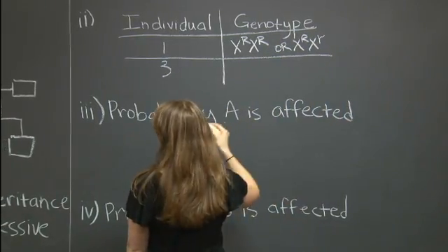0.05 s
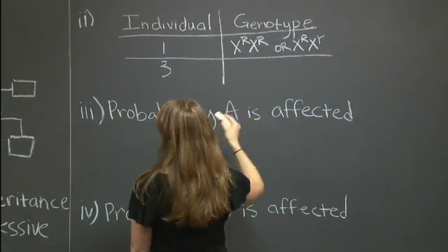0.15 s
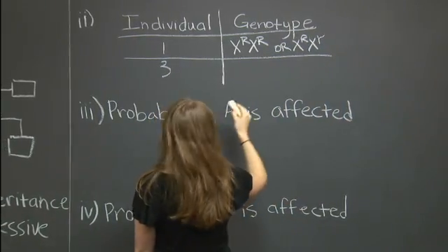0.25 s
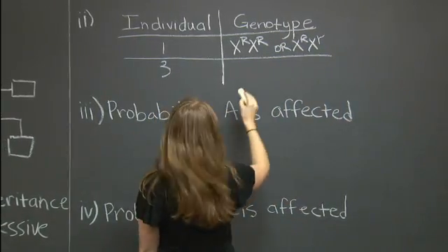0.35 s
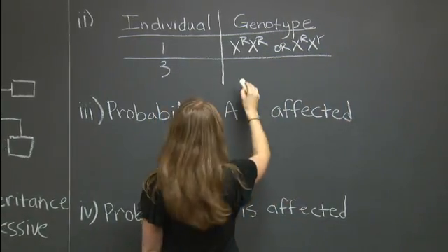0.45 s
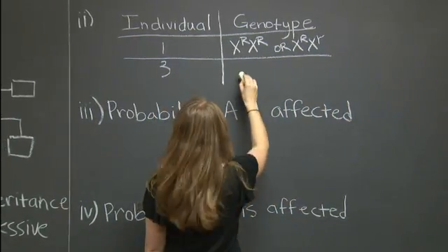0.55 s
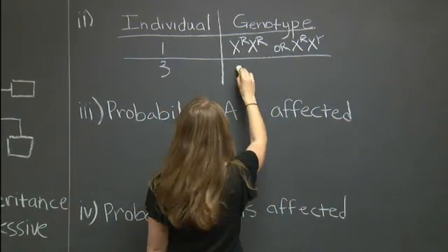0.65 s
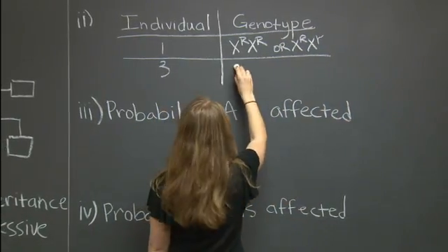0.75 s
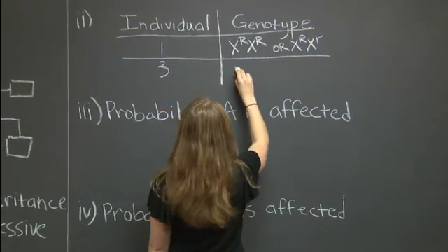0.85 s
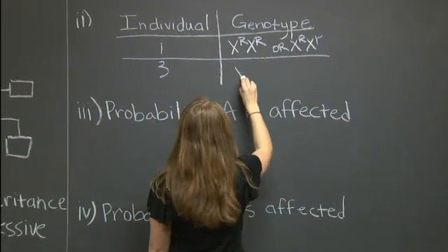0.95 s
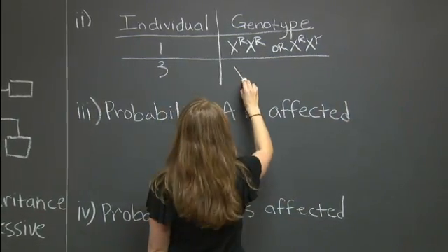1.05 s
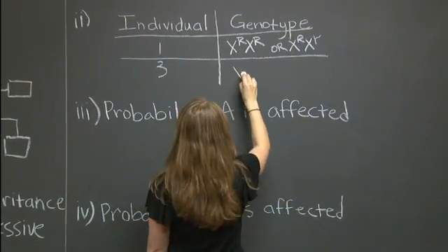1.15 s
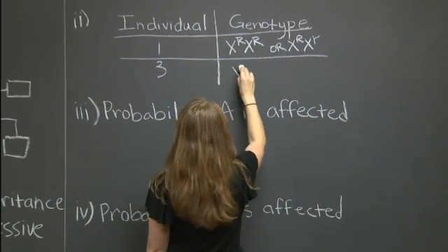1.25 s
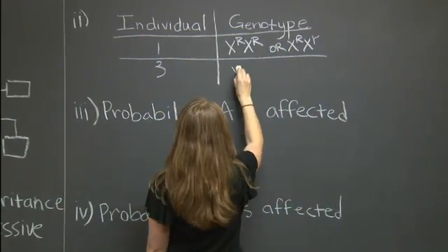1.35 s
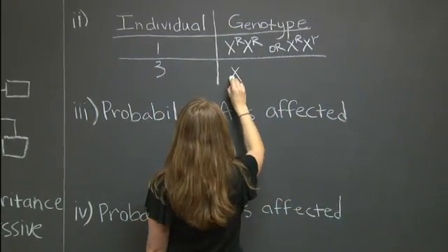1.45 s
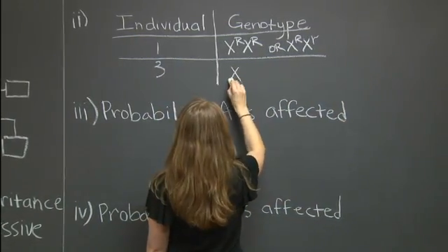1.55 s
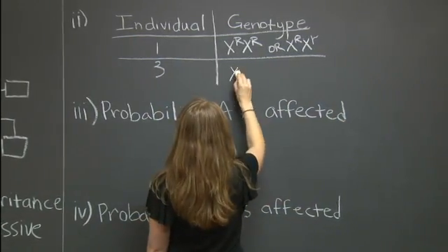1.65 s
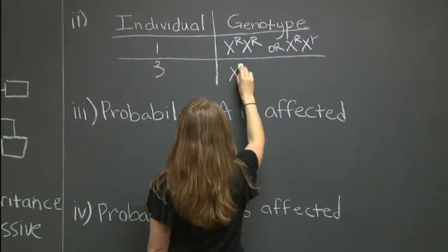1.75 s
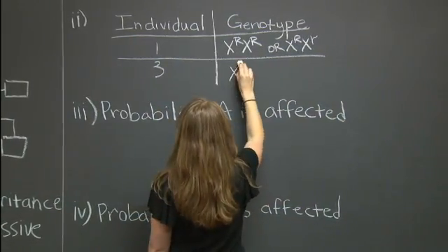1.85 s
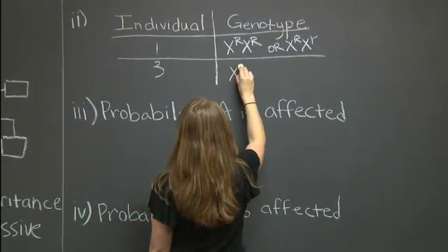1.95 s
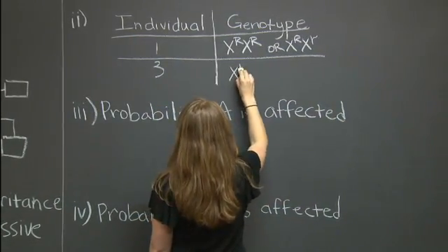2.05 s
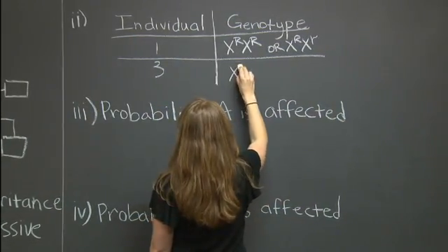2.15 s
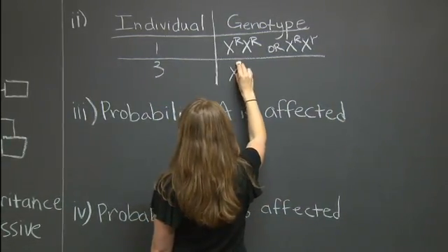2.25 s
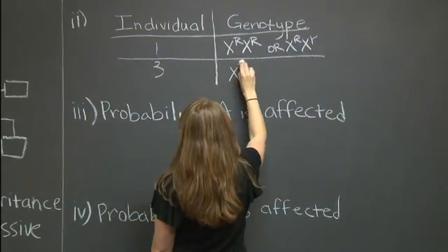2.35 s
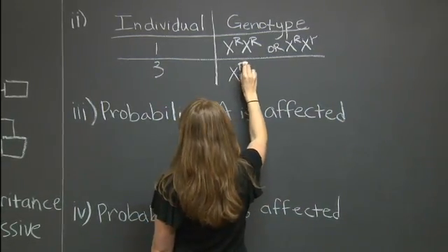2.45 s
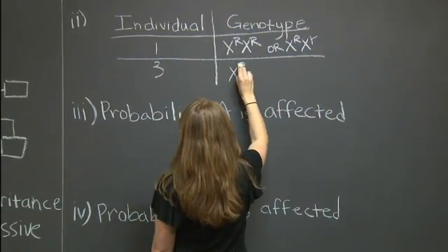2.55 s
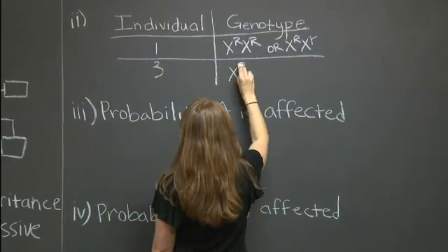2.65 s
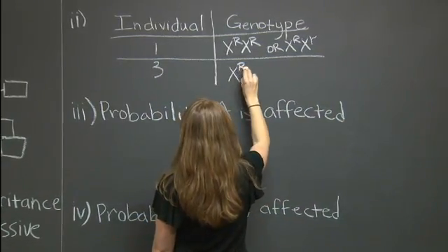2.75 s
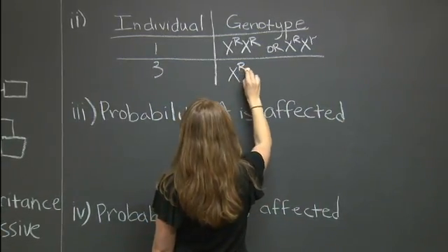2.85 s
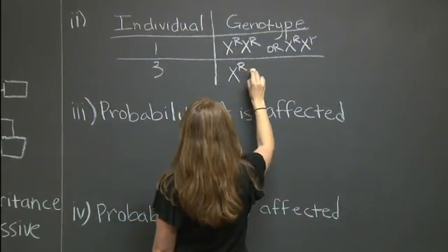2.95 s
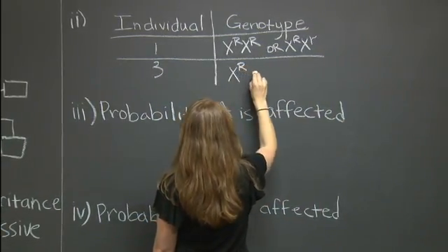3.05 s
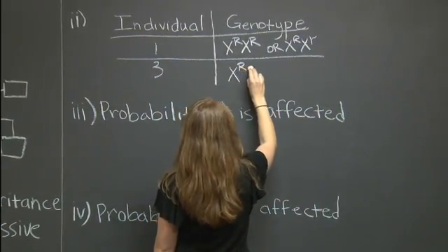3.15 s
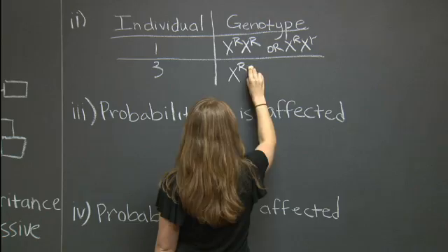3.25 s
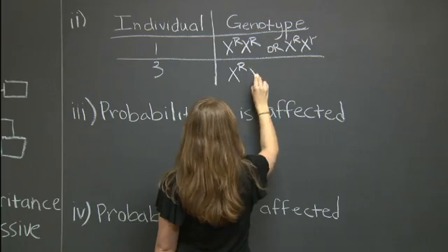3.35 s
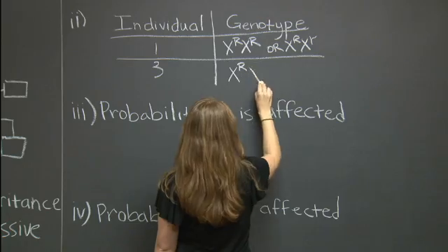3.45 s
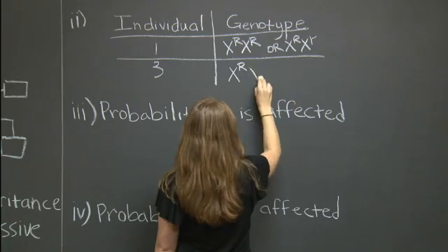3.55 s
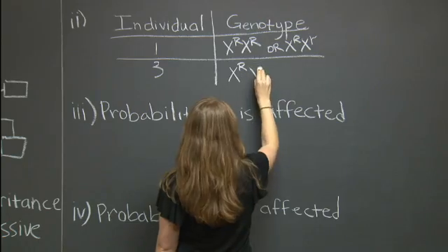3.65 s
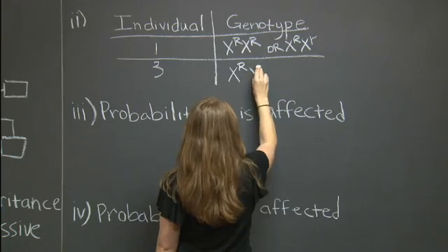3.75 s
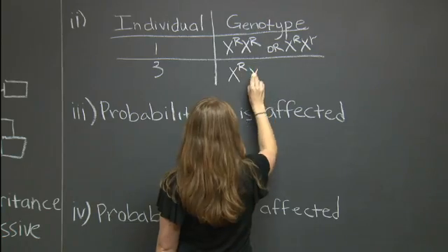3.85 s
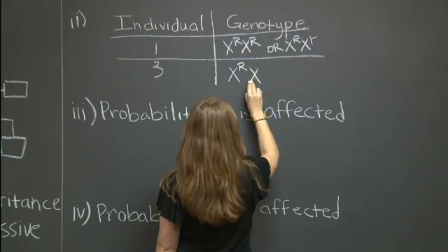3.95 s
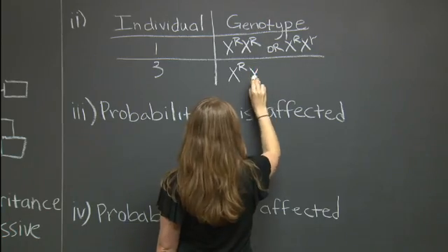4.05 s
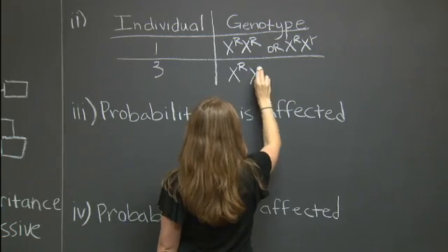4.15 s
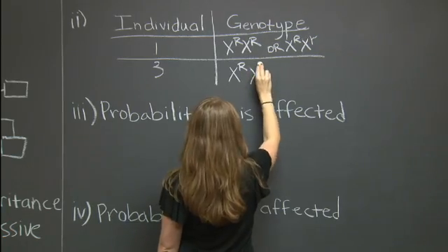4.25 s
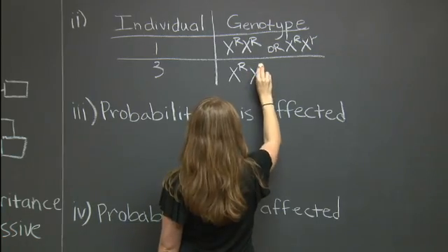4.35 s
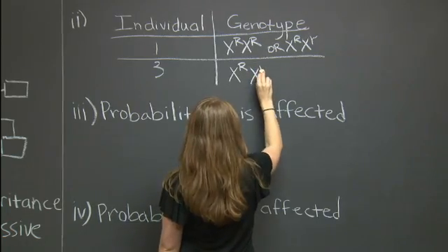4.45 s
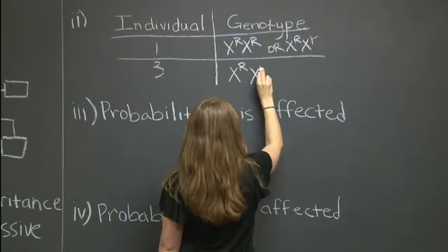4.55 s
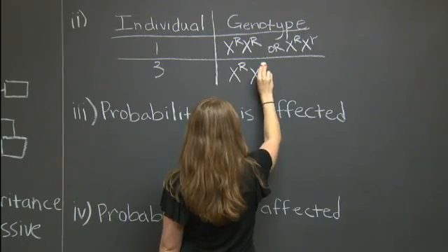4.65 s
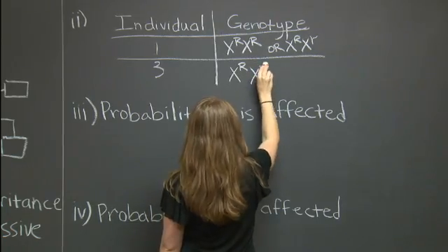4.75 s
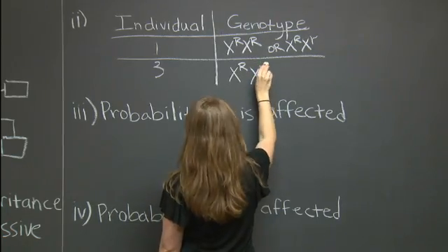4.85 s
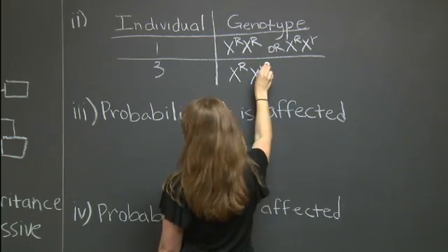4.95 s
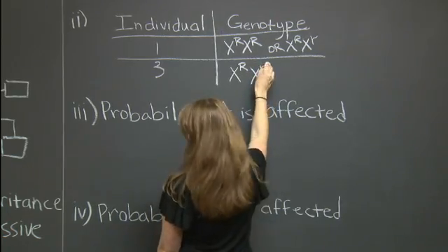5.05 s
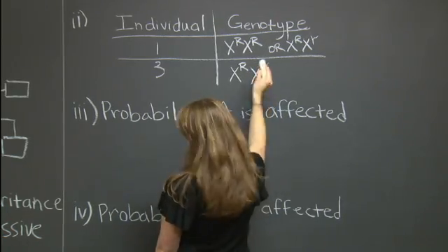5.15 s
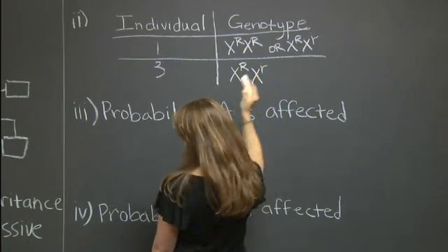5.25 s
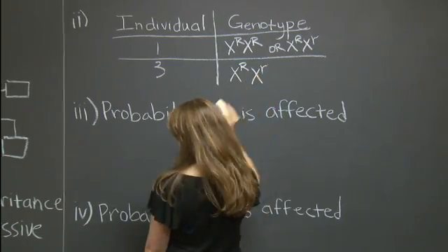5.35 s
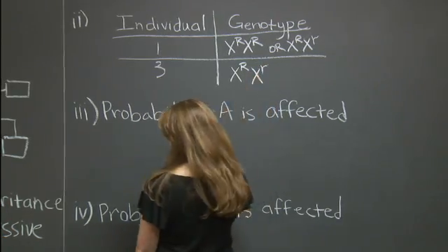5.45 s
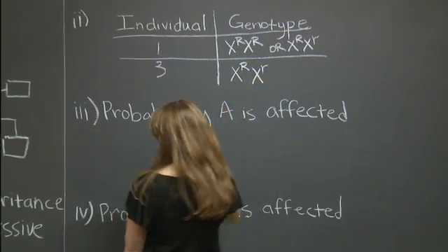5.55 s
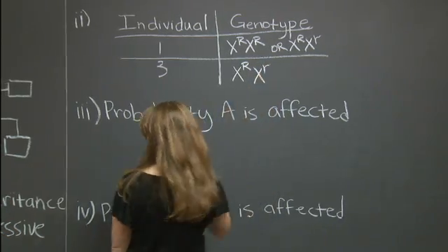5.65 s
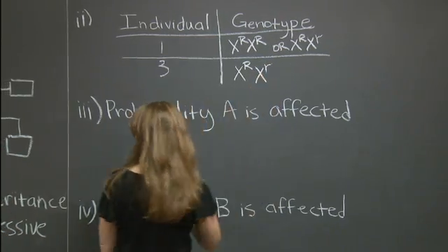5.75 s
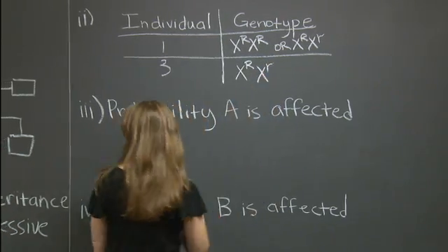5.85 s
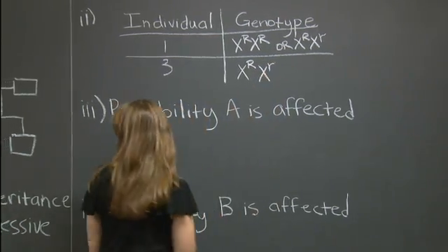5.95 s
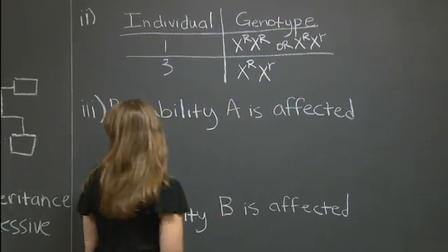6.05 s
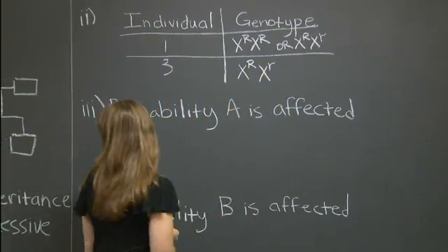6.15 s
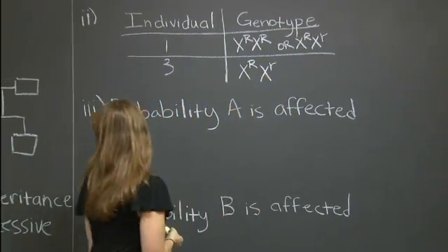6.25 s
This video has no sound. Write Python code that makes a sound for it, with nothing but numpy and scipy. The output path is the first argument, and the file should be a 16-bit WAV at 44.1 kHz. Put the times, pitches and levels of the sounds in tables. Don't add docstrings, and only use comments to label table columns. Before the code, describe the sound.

Close to one microphone in a quiet classroom, chalk writes on a solid wall blackboard. After a faint rustle, seven sharp, woody taps land at uneven half-second to one-second gaps, each followed by a short, dry, gritty scrape. The taps grow louder, peaking just before four seconds. The writing stops near five seconds, leaving soft clothing rustle and dull foot shifts over low ventilation hum.

```python
import sys
import numpy as np
from scipy import signal
from scipy.fft import rfft, irfft
from scipy.io import wavfile
from scipy.ndimage import uniform_filter1d

SR = 44100
rng = np.random.default_rng(int(sys.argv[2]) if len(sys.argv) > 2 else 0)


def to_wav(sig):
    pcm = np.clip(np.atleast_2d(sig), -1, 1) * 32767
    pcm = np.round(pcm).astype(np.int16)
    wavfile.write(sys.argv[1], SR, pcm.T)


def volts_from_decibels(level):
    exponent = np.asarray(level, float) / 20
    return 10 ** exponent


N = 277389

# (t/s, peak/dB, push/ms, rebound/ms, echo
LANDINGS = [(0.7774, -24.5, 0.5, 0.95, 1.18), (1.3673, -19.5, 0.42, 0.74, 0.97),
            (1.8965, -15, 0.38, 0.43, 1.12), (2.3083, -16, 0.39, 0.63, 1.3),
            (3.2726, -10, 0.33, 0.41, 1.45), (3.7987, -6, 0.33, 0.32, 1.41),
            (4.3303, -12.5, 0.36, 0.48, 1.23), (5.3985, -45.5, 0.54, 0.69, 0.37),
            (5.126, -60, 0.42, .45, 1.4), (2.759, -54, 0.24, 0.27, 1.3), (4.589, -57, 0.21, 0.31, 1.5)]
# (delay/ms, signed gain)
ECHOES = [(0.0, 0.96), (0.82, -0.21), (1.61, 0.5), (2.06, -0.36), (2.49, 0.27), (2.77, 0.27), (3.42, -0.32),
          (3.85, -0.43), (4.97, 0.16), (6.28, -0.19), (7.39, -0.15), (7.89, 0.17)]
# (f/Hz, width/Hz, level/dB)
BOARD_TONES = [(299.3, 28, -1.5), (413, 29, -4.5), (464, 16, -5), (612, 55, -3), (740, 150, -3.5),
               (1020, 55, 6.5), (1219, 64, 1), (1577, 190, 3.5), (1906, 140, 3.5), (2370, 60, -4),
               (2940, 490, -1.5), (3560, 130, -5.5)]
# (f/Hz, time to fall 60 dB/s)
BOARD_DECAY = [(200, 0.04), (400, 0.24), (800, 0.05), (1600, 0.034), (3000, 0.037), (8000, .02)]
# (f/Hz, time to fall 60 dB/s)
ROOM_DECAY = [(200, 0.7), (600, 0.38), (1500, 0.13), (3000, 0.73), (8000, 0.051)]
SOFT_CYCLES = 1.5
RING_DB, RING_PER_DB = -24, 0.17

# (t/s, peak/dB, knock/dB,
# sharpness/dB, stick ring/dB)
CRACKS = [(0.777, -38, -7.5, 0, -15), (1.3669, -38, -7, -6.5, -25), (1.8963, -36, -4, -9.5, -42),
          (2.308, -39.5, -1, 0, -29), (3.2728, -36.5, 3, 0.5, -27), (3.7986, -32.5, 4.5, 0, -40),
          (4.33, -41, -1, 5, -36), (6.253, -60, 1, 0, -42), (6.234, -67, 1.5, -4.5, -42),
          (2.7605, -65, 1.5, -5, -42), (2.8003, -57, 1.5, -3, -40.5)]
# (f/Hz, level/dB)
CRACK_LOW = [(2500, -29), (3000, -6.5), (3500, -4.5), (4200, -4), (4700, -7), (5300, -29)]
CRACK_MIDDLE = [(4200, -36.5), (5200, -3.5), (6300, 0), (7500, -4.5), (8600, -29.5)]
CRACK_HIGH = [(7500, -28.5), (9000, 5.5), (11000, -3), (12500, -4), (14000, -5), (15500, -6.5),
              (16400, -31.5)]
# (f/Hz, level/dB, time to fall 60 dB/s)
STICK_TONES = [(8840, 2.5, .022), (13600, -6.5, .02)]

# (t/s, level/dB, pitch f/Hz, time to fall 60 dB/s)
CLACKS = [(.7776, -43.5, 1360, 0.032), (1.3676, -46, 1740, 0.034), (1.8966, -36.5, 2310, 0.045),
          (2.3086, -32.5, 1830, 0.039), (3.2728, -47.5, 3740, 0.037), (3.7988, -40, 3065, 0.1),
          (4.3305, -34, 2020, 0.042), (5.3968, -61, 1280, 0.028), (2.759, -52.5, 1190, 0.055),
          (4.586, -59, 1400, 0.057), (1.378, -62, 1600, .12), (3.7996, -22.5, 1130, .03)]
CLACK_WIDTH = 0.18

# (t/s, length/s, fastest at share of length, grit level/dB, pressure/dB)
STROKES = [(0.82, 0.29, 0.63, -61.5, -3), (1.386, .13, 0.4, -62, 0), (1.449, 0.14, 0.47, -62.5, -3),
           (1.93, .24, 0.31, -66, -1.5), (2.34, 0.2, .4, -66.5, 3.5), (2.487, .165, 0.67, -65.5, 1),
           (2.715, 0.2, 0.35, -67, 2), (3.29, .275, 0.38, -58, -6.5), (3.809, 0.25, 0.52, -60.5, -3.5),
           (4.347, 0.22, 0.62, -66, 1), (4.579, 0.12, 0.34, -73, 10.5), (4.651, 0.13, 0.55, -70, 9),
           (4.788, .075, 0.47, -80.5, 9.5)]
# (f/Hz, level/dB per Hz)
GRIT = [(2600, -5), (2900, -5.5), (3400, -4), (3700, 0.5), (4050, -1.7), (4400, -3), (4850, -7), (5700, 0),
        (7500, -4), (8200, -2.5), (9600, -9.5), (10700, -12), (12400, -9.5), (16200, -13)]
# (f/Hz, width/Hz, level/dB)
HUM = [(1541, 67, -2), (1634, 88, -1), (1780, 60, -5)]
# (f/Hz, width/Hz, level/dB)
DRAG = [(1030, 47, -5.5), (1186, 210, -2), (1360, 72, -4)]
# (f/Hz, width/Hz, level/dB)
SINGING = [(1945, 100, 2), (2090, 100, -4.5), (2265, 110, -6.5), (2444, 110, -8)]
# (f/Hz, width/Hz, level/dB)
WEIGHT = [(658, 98, -3.5), (814, 49, -1.5)]
# (f/Hz, width/Hz, level/dB)
TIP_PRESSED = [(3080, 200, -6), (3380, 160, 0)]
# (f/Hz, width/Hz, level/dB)
TIP_LIGHT = [(4030, 130, 0.5), (4280, 130, -5)]
# (f/Hz, width/Hz, level/dB)
RIDGE = [(1660, 130, 0)]
# (level over grit/dB, level per pressure/dB per dB, power of speed)
LAYERS = [
    (-1.5, 0, 1.9),
    (1.5, 0.06, 1.3),
    (0.5, 1.06, 0.77),
    (0, 0.24, 1.5),
    (-8, 1.52, 0.98),
    (-14, 0.73, 1.7),
    (-12, -0.15, 1.1),
    (-8, -0.05, 1.3),
]
# level/dB, then time to fall 60 dB/s
LINGER_DB = (-60, -45, -40, -46, -42, -55.5, -60.5, -65)
LINGER_T60 = (.25, 0.41, 0.48, 0.55, 0.41, 0.22, .15, .15)
LINGER_PER_DB = 0.8
FULL_SPEED = 1.032

# (t/s, length/s, level/dB)
SKIMS = [(3.566, 0.29, -70.5), (4.828, 0.13, -67.5), (4.93, 0.14, -68), (5.03, .1, -76)]
# (f/Hz, width/Hz, level/dB)
SKIN_TONES = [(646, 150, 0), (946, 80, -2.5), (1250, 150, -10), (1742, 240, -14), (2265, 94, -9)]

# (t/s, length/s, rustle/dB, brightness/dB, floor thud/dB)
MOVES = [(0.0, 0.064, -68.5, -11, -90), (0.404, 0.47, -69.5, -12, -70), (1.07, 0.15, -73, -23, -72),
         (2.877, 0.17, -75, -24, -72), (5.1, 0.076, -72.5, -13, -81.5), (5.22, 0.26, -79, -2.5, -75),
         (5.437, 0.16, -65, -10.5, -61.5), (5.568, 0.13, -68, -7.5, -60.5), (5.656, 0.14, -65.5, -12, -58),
         (5.775, 0.13, -68, -10.5, -65.5), (5.868, 0.15, -65.5, -8.5, -65), (5.98, 0.29, -71, -8.5, -69.5),
         (6.191, 0.14, -74, -9, -75)]
# (f/Hz, level/dB per Hz)
CLOTH = [(300, -5.5), (400, -8.5), (570, -1.5), (788, -14), (950, -10), (1700, -16), (2210, -17.5),
         (2700, -26), (6840, -43), (16200, -47.5)]

# (f/Hz, level/dB per Hz)
AIR = [(11, -46), (24, -19.5), (50, -3.5), (170, -2), (239, -8.5), (300, -10.5), (366, -17.5), (544, -20.5),
       (1370, -27.5), (1700, -29), (4000, -36), (11100, -43), (16200, -44.5)]

# (lower edge f/Hz, limit/dB per Hz)
FAINT_LIMITS = [(12060, -125.3), (12750, -124.6), (13440, -123.5), (14130, -116.5), (14990, -107),
                (15700, -101)]


def taps():
    out = np.zeros(N)
    ms = np.arange(400) / SR * 1000 - 2
    ring_t = np.arange(8000) / SR
    thump_t = np.arange(4000) / SR
    for s, peak_db, push, rebound, echo in LANDINGS:
        phase = (ms - push / 2) / np.where(ms < push / 2, 2 * push, 2 * rebound)
        blow = -np.sin(2 * np.pi * phase) * np.exp(-(phase / 0.53) ** 4)
        blow -= 0.038 * np.exp(-((ms + push / 2 + 0.16) / 0.029) ** 2)
        soft_hz = 1000 * SOFT_CYCLES / (push + rebound)
        blow = signal.sosfiltfilt(signal.butter(2, soft_hz, fs=SR, output="sos"), blow)
        paths = np.zeros(800)
        for delay, gain in ECHOES:
            paths[round(delay * SR / 1000)] = gain * (echo if delay else 1)
        add(out, s - 2 / 1000, volts_from_decibels(peak_db) * np.convolve(blow, paths))

        ring = decay(resonant(rng.standard_normal(8000), BOARD_TONES), BOARD_DECAY)[:8000]
        ring *= np.clip(ring_t / 0.0079 - 0.5, 0, 1)
        ring_db = peak_db * (1 + RING_PER_DB) + RING_DB + 18
        add(out, s, volts_from_decibels(ring_db) * np.convolve(blow, ring))

        room = decay(rng.standard_normal(24000), ROOM_DECAY)
        add(out, s + 0.012, volts_from_decibels(peak_db - 14.5) * signal.fftconvolve(blow, room))
        thump = np.sin(2 * np.pi * 110 * thump_t) * np.exp(-thump_t / 0.016)
        add(out, s, volts_from_decibels(0.4 * peak_db - 38) * thump)
    return out


def ticks():
    out = np.zeros(N)
    t = np.arange(-100, 924) / SR
    after = np.maximum(t, 0)
    for s, peak_db, low_db, high_db, stick_db in CRACKS:
        crack = 0
        parts = ((CRACK_LOW, low_db, 0.006), (CRACK_MIDDLE, 0, 0.003), (CRACK_HIGH, high_db, 0.0015))
        for colour, db, linger in parts:
            crumbs = 0.032 * rng.standard_normal(1024) * (t > 0) * np.exp(-after / linger)
            part = coloured((t == 0) + crumbs, colour) * signal.windows.tukey(1024, 0.15)
            crack = crack + volts_from_decibels(db) * part / abs(part).max()
        stick = sum(volts_from_decibels(db - 60 * after / t60) * np.sin(2 * np.pi * hz * after)
                    for hz, db, t60 in STICK_TONES)
        add(out, s - 90 / SR, volts_from_decibels(peak_db) * (crack + volts_from_decibels(stick_db) * stick))
        room = decay(rng.standard_normal(12000), ROOM_DECAY)
        add(out, s + 0.002, volts_from_decibels(peak_db - 25) * signal.fftconvolve(crack, room))
    return out


def clacks():
    out = np.zeros(N)
    t = np.arange(8000) / SR
    for s, level_db, pitch_hz, t60 in CLACKS:
        cluster = [(pitch_hz * shift, pitch_hz * CLACK_WIDTH, 0) for shift in (0.9, 1.1)]
        burst = resonant(resonant(rng.standard_normal(8000), cluster), cluster)
        add(out, s, volts_from_decibels(level_db - 60 * t / t60) * np.minimum(t / 0.0006, 1) * burst)
    return out


def gritty_hiss():
    z = signal.stft(coloured(grains(2.2, 60), GRIT), nperseg=256)[2]
    patches = uniform_filter1d(rng.standard_normal(z.shape), size=4, axis=0)
    patches = evened(uniform_filter1d(patches, size=30, axis=1))
    return evened(signal.istft(z * volts_from_decibels(2.2 * patches), nperseg=256)[1][:N])


def strokes():
    hum = resonant(grains(1.5, 500), HUM)
    sounds = (gritty_hiss(), hum, resonant(grains(1.8, 500), DRAG), resonant(grains(1.5, 400), SINGING),
              resonant(grains(1.2, 500), WEIGHT), resonant(grains(2.0, 400), TIP_PRESSED),
              resonant(grains(2.0, 400), TIP_LIGHT), resonant(hum, RIDGE))
    start, length, top, grit_db, press_db = np.transpose(STROKES)
    out = np.zeros(N)
    for x, layer, linger_db, t60 in zip(sounds, LAYERS, LINGER_DB, LINGER_T60):
        db, per_db, power = layer
        moving = swells(start, length, top, grit_db + db + per_db * press_db, power)
        out += x * np.hypot(moving, lingering(linger_db, t60))
    return out


def lingering(level_db, t60):
    out = np.zeros(N)
    t = np.arange(SR // 2) / SR
    for s, peak_db, *_ in LANDINGS:
        db = (1 + LINGER_PER_DB) * peak_db + level_db - 60 * t / t60
        add(out, s, volts_from_decibels(db) * np.minimum(t / 0.0087, 1))
    return out


def swells(starts, lengths, tops, level_db, power):
    out = np.zeros(N)
    for s, length, top, db in np.broadcast(starts, lengths, np.clip(tops, 0.05, 0.95), level_db):
        u = np.arange(0, length, 1 / SR) / length
        rise_fall = np.minimum(u / top, (1 - u) / (1 - top))
        speed = np.minimum(FULL_SPEED * np.sin(np.pi / 2 * rise_fall), 1)
        add(out, max(s, 0), volts_from_decibels(db) * speed ** power)
    return out


def skims():
    start, length, level_db = np.transpose(SKIMS)
    return resonant(grains(1.2, 400), SKIN_TONES) * swells(start, length, 0.33, level_db, 0.45)


def moves():
    cloth = coloured(grains(1.4, 700), CLOTH)
    dull = signal.sosfiltfilt(signal.butter(2, 3000, fs=SR, output="sos"), cloth)
    bright = evened(cloth - dull)
    thud = coloured(grains(1.7, 1500), [(15, -12), (30, 0.5), (60, 0.0), (140, -11.5), (300, -12)])
    start, length, rustle_db, bright_db, thud_db = np.transpose(MOVES)
    parts = ((evened(dull), rustle_db), (bright, rustle_db + bright_db), (thud, thud_db))
    return sum(x * swells(start, length, 0.35, db, 0.61) for x, db in parts)


def air():
    return volts_from_decibels(-62) * coloured(grains(0.9, 3000), AIR)


def grains(spread_db, hold):
    flicker = evened(uniform_filter1d(rng.standard_normal(N), size=hold))
    return rng.standard_normal(N) * volts_from_decibels(spread_db * flicker)


def decay(noise, t60s):
    hz, t, z = signal.stft(noise, SR, nperseg=128)
    tail = signal.istft(z * volts_from_decibels(-60 * t / read(t60s, hz)[:, None]), SR, nperseg=128)[1]
    return tail / np.linalg.norm(tail)


def resonant(x, modes):
    hz = np.fft.rfftfreq(len(x), 1 / SR)
    power = sum(volts_from_decibels(2 * db) / (1 + (2 * (hz - f) / w) ** 2) ** 1.5 for f, w, db in modes)
    return evened(irfft(rfft(x) * np.sqrt(power), len(x)))


def coloured(x, points):
    hz = np.fft.rfftfreq(len(x), 1 / SR)
    inside = (hz >= points[0][0]) & (hz <= points[-1][0])
    return evened(irfft(rfft(x) * volts_from_decibels(read(points, hz)) * inside, len(x)))


def read(points, hz):
    f, value = np.transpose(points)
    return np.interp(np.log(hz + 1), np.log(f + 1), value)


def evened(x):
    return x / np.sqrt(np.mean(x ** 2) + 1e-20)


def add(mix, s, sound):
    part = mix[round(s * SR):][:len(sound)]
    part += sound[:len(part)]


def scene():
    chalk = taps() + ticks() + clacks() + strokes()
    return (chalk + skims() + moves() + air())[None]


def low_pass(x):
    return signal.sosfilt(signal.butter(12, 16520, fs=SR, output="sos"), x)


def record(dry):
    hz, _, z = signal.stft(dry[0], SR, nperseg=1024, noverlap=768, scaling="psd")
    struck = (abs(z) ** 2).mean(0) > volts_from_decibels(2 * -84)
    edges = [edge for edge, _ in FAINT_LIMITS] + [SR / 2]
    for (edge, limit_db), top in zip(FAINT_LIMITS, edges[1:]):
        band = (hz >= edge) & (hz < top)
        power = uniform_filter1d(2 * (abs(z[band][:16]) ** 2).mean(0), size=3)
        z[band] *= struck | (power > volts_from_decibels(2 * limit_db))
    kept = signal.istft(z, SR, nperseg=1024, noverlap=768, scaling="psd")[1][:N]
    return low_pass(kept[None])


dry = scene()
out = record(dry)
to_wav(out)
```